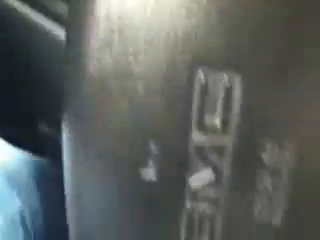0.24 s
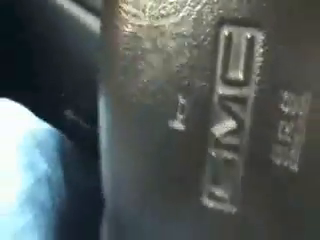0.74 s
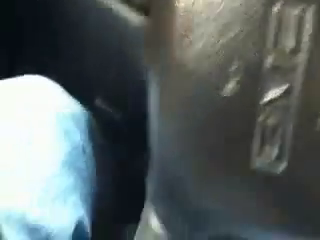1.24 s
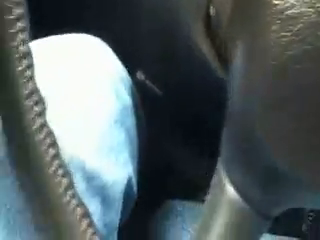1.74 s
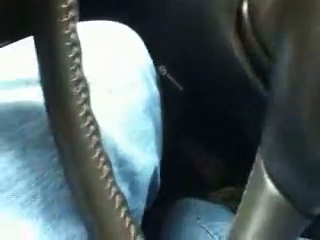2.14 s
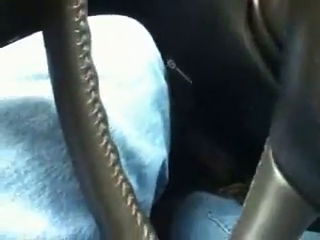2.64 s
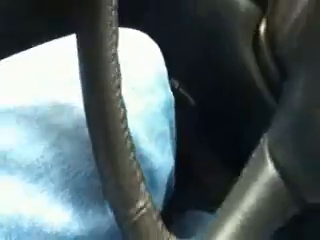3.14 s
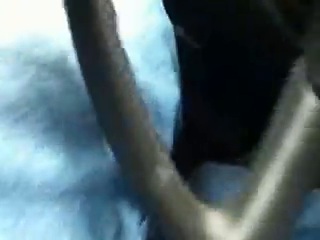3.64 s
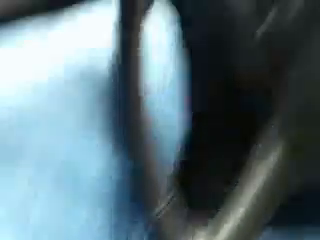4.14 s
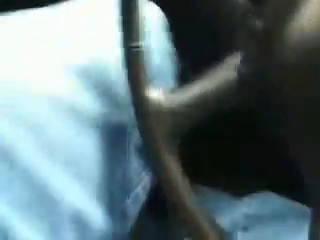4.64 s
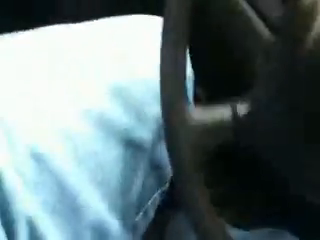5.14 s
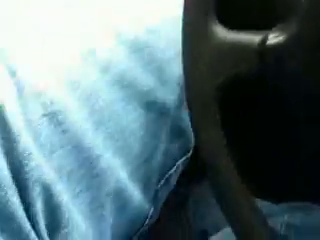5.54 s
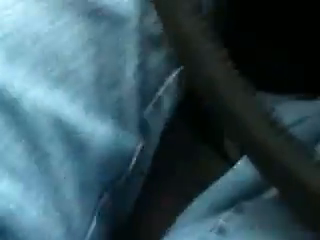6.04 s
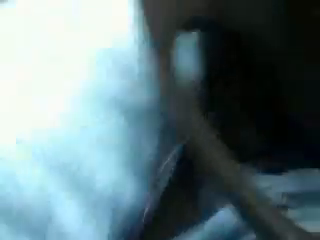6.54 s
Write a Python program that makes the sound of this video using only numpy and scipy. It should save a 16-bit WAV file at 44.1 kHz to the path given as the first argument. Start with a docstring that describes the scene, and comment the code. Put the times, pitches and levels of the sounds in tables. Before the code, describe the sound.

Inside a truck cab, a deep V8 engine surges and drops over churning, hissing water, with trim clicks, floor thuds and a late slosh.

```python
"""Inside the cab of a V8 pickup wading through deep water, picked up by a hand-held camera.
The engine surges from the start over drumming and churning water and a hiss; loose trim clicks and clacks.
From about 1.2 s dull blows land on the floor; a faint squeal comes near 1.9 s and the engine speeds up.
The throttle is stabbed at 3 s and a dry snap follows at 3.9 s; near 4.5 s water sloshes and slaps.
Hand bumps and rubs on the camera gather there and again from 6 s, when the heaviest floor blows land."""
import sys
import numpy as np
from scipy import signal
from scipy.fft import rfft, irfft, next_fast_len
from scipy.io import wavfile
from scipy.ndimage import uniform_filter1d, minimum_filter1d, map_coordinates

SR = 44100
rng = np.random.default_rng(int(sys.argv[2]) if len(sys.argv) > 2 else 0)


def bounce(signal):
    """Save signal as a 16-bit WAV file at the path given by the first command-line argument."""
    frames = np.transpose(np.atleast_2d(signal))
    limited = np.clip(frames, -1, 1)
    pcm = np.round(limited * 32767).astype(np.int16)
    wavfile.write(sys.argv[1], SR, pcm)


N = 299880
USUAL_LOAD_DB = -25  # the engine load at which the boom and water levels below apply


def amp(db):
    """Decibels to an amplitude factor."""
    return 10 ** (np.asarray(db) / 20)


def unit(x):
    """x scaled to rms 1."""
    return x / np.sqrt(np.mean(x ** 2) + 1e-20)


def noise(length=N):
    """White noise."""
    return rng.standard_normal(length)


def curves(rows):
    """One value per sample for each column after the time."""
    s, *columns = np.transpose(rows)
    return [np.interp(np.arange(N) / SR, s, column) for column in columns]


def along(points, hz):
    """(Hz, value) points read on a log frequency axis."""
    f, values = np.transpose(points)
    return np.interp(np.log(hz + 1), np.log(f), values)


def wobble(rate):
    """A smooth random curve, rate knots a second."""
    knots = noise(int(N * rate / SR) + 4)
    return map_coordinates(knots, [np.arange(N) * rate / SR])


def swells(rows):
    """A sum of bell-shaped bumps; the half length is the bell's standard deviation."""
    t = np.arange(N) / SR
    return sum(amp(db) * np.exp(-.5 * ((t - s) / half) ** 2) for s, db, half in rows)


def filtered(x, response):
    """x times a response of frequency."""
    m = next_fast_len(N + SR // 2)
    return irfft(rfft(x, m) * response(np.fft.rfftfreq(m, 1 / SR)), m)[:N]


def coloured(x, spectrum):
    """x shaped by (Hz, dB) points, at rms 1."""
    return unit(filtered(x, lambda hz: amp(along(spectrum, hz))))


def grains(rate, spread_db):
    """Random tiny impacts of uneven size, rate a second."""
    hits = rng.random(N) < rate / SR
    return unit(hits * noise() * amp(spread_db * noise()))


def steadied(x, span):
    """Narrow noise with its swells longer than span seconds evened out."""
    power = uniform_filter1d(np.abs(signal.hilbert(x)) ** 2, max(int(span * SR), 1))
    return unit(x / np.sqrt(np.abs(power) + 1e-9))


def add(track, s, sound):
    """Mix a sound in at s seconds."""
    part = track[round(s * SR):][:len(sound)]
    part += sound[:len(part)]


def engine(load_db):
    """Eight firings a cycle boom in the cab; the uneven cylinder banks add the other multiples."""
    # engine speed: (time [s], firing rate [Hz])
    speed = [(0, 111.8), (.3, 90.13), (.55, 89.73), (.85, 93.9), (1.02, 81.2), (1.25, 67), (1.95, 66.05),
             (2.17, 86), (2.3, 98.1), (2.47, 126), (2.7, 132), (2.85, 120), (2.95, 86.6), (3.2, 117.8),
             (3.4, 123.2), (3.8, 127.3), (4, 98.1), (4.15, 89.05), (4.47, 93), (4.92, 68.9), (5.3, 105),
             (5.46, 107.2), (5.65, 84), (6.15, 66.8), (6.37, 80), (6.58, 110.2), (6.8, 102.2)]
    # firing tone at the usual load: (frequency [Hz], level [dB])
    boom_levels = [(66, -44), (80, -31), (90, -23), (102, -19.5), (116, -17.5), (131, -17)]
    # overtones of the four-stroke cycle: (multiple, relative level [dB])
    overtones = [(3, -10), (4, -7), (6, -18), (7, -20.5), (9, -3.5), (10, -4.5), (11, -3.5), (12, 0.5),
                 (13, -2.5), (14, -9.5), (15, -10), (16, -1.5), (17, -7), (19, -5.5), (21, -9.5),
                 (22, -10.5), (24, -16.5), (29, -22.5), (32, -21.5)]
    # bands that the cab lifts: (frequency [Hz], width [Hz], lift [dB])
    cab = [(177, 7.4, 3), (241.8, 15.6, 7.5), (328, 28, 7.5)]
    # the engine lugs and the exhaust throbs deeply: (time [s], level [dB], half length [s])
    lugs = [(4.37, -24, .12), (6.42, -26.5, 0.12)]
    # intake roar: (frequency [Hz], density [dB per Hz])
    roar_spectrum = [(200, -23), (360, -4), (450, 0.5), (600, -7), (800, -26), (2000, -30), (8000, -58.5)]
    boom_per_load = 0.37  # dB of firing tone gained per dB of load
    flutter_db = 1.5  # uneven strength from one firing to the next
    pipe_hz, pipe_width_hz, pipe_lift_db = 61.3, 10, 9.5  # the exhaust pipe's resonance
    burble_below_load_db = -13.5  # away from the pipe's resonance
    roar_db = -39.5  # at the fastest turn

    firing_hz, = curves(speed)
    cycle = 2 * np.pi * np.cumsum(firing_hz) / SR / 8
    firing, bank, bank_hz = 8 * cycle, 5 * cycle, firing_hz * 5 / 8

    boom_db = along(boom_levels, firing_hz) + boom_per_load * (load_db - USUAL_LOAD_DB) + throttle()
    boom_db = boom_db + 1.24 * wobble(22.02) + flutter_db * wobble(90)
    boom = amp(boom_db) * np.sin(firing + 0.035 * wobble(36))

    pipe_db = pipe_lift_db / (1 + ((bank_hz - pipe_hz) / pipe_width_hz) ** 2)
    burble_db = load_db + burble_below_load_db + pipe_db + 2.2 * wobble(13)
    burble = (amp(burble_db) + swells(lugs)) * np.sin(bank + .15 * wobble(28))

    # no two cycles burn alike, so each overtone wavers in strength and phase
    growl = np.zeros(N)
    for multiple, db in overtones:
        phase = rng.uniform(0, 2 * np.pi) + 0.33 * wobble(14)
        growl += amp(db + 2.26 * wobble(16)) * np.sin(round(multiple) * cycle + phase)
    growl = filtered(growl, lambda f: amp(sum(db / (1 + ((f - hz) / width) ** 2) for hz, width, db in cab)))

    # the intake roars in puffs, louder the faster the engine turns
    puffs = coloured(noise() * (1 + .5 * np.sin(firing)), roar_spectrum)
    roar = amp(roar_db) * (firing_hz / firing_hz.max()) ** 1.76 * puffs
    return np.sqrt(2) * (boom + burble) + amp(load_db) * unit(growl) + roar, firing


def throttle():
    """Extra boom in dB: each stab opens fast, sags while held, and closes."""
    # stabs of the throttle: (time [s], held [s], extra boom [dB])
    stabs = [(.55, 0.22, 6.5), (3.02, 0.89, 7), (5.19, 0.358, 9), (6.42, 0.16, 8), (6.74, 0.073, 2)]
    attack_s, release_s, sag_db_per_s = 0.04, 0.036, 5.5
    t, boost = np.arange(N) / SR, np.zeros(N)
    for s, held, db in stabs:
        opening = np.clip((t - s) / attack_s, 0, 1)
        closing = np.exp(-np.maximum(t - s - held, 0) / release_s)
        boost += opening * closing * (db - sag_db_per_s * np.clip(t - s, 0, held))
    return boost


def water(firing, load_db):
    """Waves drum on the floor pan and rock the body; the flow churns in step with the firing, and hisses."""
    # water rushing along the body: (time [s], flow [dB])
    flow_points = [(0, -38.5), (.55, -40.5), (.95, -38), (1.17, -36), (1.55, -44), (2.1, -43.5), (2.7, -46),
                   (3.0, -39.5), (3.5, -44), (3.72, -38.5), (4.15, -41), (4.5, -27.5), (4.68, -33),
                   (4.9, -36.5), (5.22, -36), (5.52, -40.5), (5.78, -33), (6.1, -30), (6.45, -38.5),
                   (6.58, -36), (6.72, -27), (6.8, -26)]
    # waves that heave against the underside: (time [s], half length [s], drumming [dB], rumble [dB])
    waves = [(.07, 0.16, -29, -24.5), (0.723, 0.42, -29, -47), (1.287, 0.067, -45, -34),
             (2.073, 0.088, -29, -52), (2.645, 0.19, -35, -33), (3.713, 0.071, -23.5, -29),
             (4.074, 0.23, -29, -33), (4.437, 0.054, -17.5, -35), (4.627, 0.051, -14.5, -33),
             (5.164, 0.054, -26, -37), (6.075, 0.052, -22, -17.5), (6.34, 0.078, -26, -27)]
    # the hiss swells: (time [s], level [dB], half length [s])
    hiss_swells = [(.01, -41.5, 0.059), (1.82, -46.5, 0.33), (2.75, -55, 0.29), (3.68, -52, 0.029),
                   (4.1, -54, 0.16), (4.505, -33.5, 0.032)]
    # resonances of floor pan and cab air: (frequency [Hz], width [Hz], level [dB])
    pan_modes = [(137, 44, -2.5), (170.1, 30, -5.5)]
    # spectra of the four noises: (frequency [Hz], density [dB per Hz])
    rumble_spectrum = [(10, -25), (25, -10), (45, -4), (80, 0.5), (115, -15), (180, -17), (400, -69)]
    churn_spectrum = [(100, -37), (180, 0), (240, 4), (320, 1), (450, -6), (600, -22), (1000, -40),
                      (3000, -94.5)]
    wash_spectrum = [(200, -33), (450, 3), (620, 1), (850, -3.5), (1300, -10.5), (2000, -17.5),
                     (3200, -21.5), (8000, -33)]
    hiss_spectrum = [(500, -16), (1300, 4.5), (2200, 2.5), (2800, 1), (3400, 1), (5000, 0), (8000, -1),
                     (11000, -3), (13000, -8.5)]
    # each layer: its level at usual flow and load [dB], and the dB it gains per dB of load or flow
    drum_db, drum_per_load = -24.5, 0.16
    rumble_db, rumble_per_load = -31, 0.33
    churn_db, churn_per_flow = -29.5, 0.82
    hiss_db, hiss_per_flow = -54.5, 1
    usual_flow_db = -38
    steady_hiss_db = -57.5  # thin hiss that never stops
    wash_to_flow_db, gurgle_to_flow_db = -1.5, -5.5

    flow_db, = curves(flow_points)
    surge_db, push_db = flow_db - usual_flow_db, load_db - USUAL_LOAD_DB
    slaps = swells([(s, db, half) for s, half, db, _ in waves])
    heaves = swells([(s, db, half) for s, half, _, db in waves])

    def pan(f):
        """Resonances of alternating sign, falling off above 260 Hz."""
        modes = 0
        for k, (centre, width, db) in enumerate(pan_modes):
            damping = 1j * f * width
            modes = modes + (-1) ** k * amp(db) * damping / (centre ** 2 - f ** 2 + damping)
        return modes / (1 + (f / 260) ** 4)

    drumming = steadied(filtered(noise(), pan), span=0.11)
    drum = (amp(drum_db + drum_per_load * push_db) + slaps) * drumming

    rocking = steadied(coloured(noise(), rumble_spectrum), span=0.19)
    rumble = (amp(rumble_db + rumble_per_load * push_db) + heaves) * rocking

    pulsed = noise() * (1 + 0.38 * np.sin(firing))
    churn = amp(churn_db + churn_per_flow * surge_db) * coloured(pulsed, churn_spectrum)

    wash_grain = noise() + 0.81 * grains(1500, spread_db=1.5)
    wash = amp(flow_db + wash_to_flow_db + 1.47 * wobble(25)) * coloured(wash_grain, wash_spectrum)

    hiss_grain = noise() + 0.37 * grains(500, spread_db=3)
    hiss_level = amp(steady_hiss_db) + amp(hiss_db + hiss_per_flow * surge_db) + swells(hiss_swells)
    hiss = hiss_level * coloured(hiss_grain, hiss_spectrum)
    return drum + rumble + churn + wash + hiss + amp(flow_db + gurgle_to_flow_db) * gurgle()


def gurgle():
    """Bubbles under the floor, each a short ring that rises a little in pitch."""
    middle_hz, log_spread = 721.4, 0.705
    cycles = 31  # cycles of ringing to fall by 60 dB
    track, t = np.zeros(N), np.arange(SR // 12) / SR
    for when, pitch, size in rng.random((900, 3)):
        odds = np.clip(pitch, .02, .98) / (1 - np.clip(pitch, .02, .98))
        hz = middle_hz * odds ** (log_spread / 2)
        age = t * hz / cycles
        ring = np.sin(2 * np.pi * hz * t * (1 + 0.044 * age))
        ring = ring * (1 - np.exp(-t * hz)) * amp(-60 * age)
        # bubbles above the middle pitch are weaker
        add(track, when * N / SR, amp(-16 * size) * min(1, middle_hz / hz) * ring)
    return unit(track)


def sloshes():
    """Thick slugs of water tumble against the doors in uneven lumps."""
    # slugs of water: (time [s], level [dB], half length [s])
    slugs = [(4.46, -26, .016), (4.535, -27, 0.021), (4.65, -30.5, 0.075), (5.8, -40.5, .14)]
    # slosh: (frequency [Hz], density [dB per Hz])
    slosh_spectrum = [(150, -23), (400, 3), (560, -4), (750, -11), (980, -7), (1400, -23), (5000, -70)]
    lump_db, lumps_per_s = 4, 55
    lumps = unit(amp(lump_db * wobble(lumps_per_s)))
    return swells(slugs) * lumps * coloured(noise(), slosh_spectrum)


def thumps():
    """Soft blows set the floor booming in a dying sine with a softened onset."""
    # dull blows on the floor: (time [s], level before the soft onset [dB], pitch [Hz], 60 dB decay [s])
    blows = [(1.239, -4.5, 123, 0.21), (1.397, -9.5, 139.3, 0.28), (1.676, -7.5, 134, 0.16),
             (2.159, -8, 140.3, 0.19), (2.85, -6.5, 159, 0.17), (4.456, 1, 109, 0.055),
             (4.56, -1, 157.8, 0.18), (4.681, -3.5, 157.8, 0.16), (5.195, -0.5, 150, 0.087),
             (6.063, 12.5, 120.1, 0.034), (6.762, 13, 109, 0.087)]
    onset_s = 0.0051
    track, t = np.zeros(N), np.arange(SR // 3) / SR
    for s, db, hz, t60 in blows:
        add(track, s, amp(db - 60 * t / t60) * (1 - np.exp(-t / onset_s)) * np.sin(2 * np.pi * hz * t))
    return track


def clicks():
    """Loose trim chatters: each contact rings, knocks the panel and touches again; a clack and a snap stand out."""
    # small trim contacts: (time [s], level [dB], pitch [Hz], 60 dB decay [s], panel knock against level [dB])
    touches = [(0.5541, -31, 1730, 0.035, -1.5), (0.6995, -33, 2100, 0.045, -2),
               (.783, -34, 8000, .025, -7), (.799, -28.5, 3360, .05, -6), (0.8497, -31, 3550, .035, -8),
               (0.999, -33.5, 3430, 0.078, -11), (1.0109, -22.5, 1240, 0.04, -15),
               (1.111, -25.5, 3359, 0.05, -7), (1.175, -33, 2000, 0.046, 0), (1.222, -36, 2990, .045, -13),
               (1.593, -32.5, 2661, 0.035, -5), (3.612, -35, 6892, 0.033, -8),
               (4.789, -32.5, 7500, 0.02, -20), (4.9226, -28.5, 6432, 0.02, -19),
               (4.9543, -29.5, 4600, 0.015, -20), (5.035, -27, 7640, 0.026, -15),
               (5.052, -34, 5500, .09, -18), (5.1191, -20.5, 1350, 0.04, -16), (5.252, -35, 5200, .04, -20),
               (5.367, -35, 8600, .02, -23), (5.8906, -17, 4090, 0.011, -22),
               (6.445, -33.5, 6300, 0.028, -17), (6.47, -34, 6000, .025, -12),
               (6.759, -26, 7070, .008, -15)]
    # plastic trim panel: (frequency [Hz], level [dB], 60 dB decay [s])
    panel = [(580, -7, 0.03), (944, 2, 0.043), (1277, -1, 0.035), (1600, -2, 0.05), (2080, -6, 0.045)]
    # what the clack and the snap ring with: (frequency [Hz], level [dB], 60 dB decay [s])
    clack_modes = [(1460, -8, 0.06), (3720, -6.5, 0.025), (4370, -4.5, 0.026), (5260, -8, .032),
                   (6100, -3.5, .028), (7780, -2, 0.019), (10500, -5, 0.028)]
    snap_modes = [(1180, -1.5, 0.0062), (1840, -1.5, 0.0049), (3430, -7, 0.0042), (5200, -18, .003),
                  (9000, -13, 0.0009)]
    clack_s, clack_db, rebound_s, rebound_db = .8833, -15, .003, -5  # the clack strikes twice
    snap_s, snap_db = 3.9186, -.5
    tick_s, tick_db, tick_hz, tick_t60 = 3.918, -11, 5200, 0.02  # the catch slips just before the snap
    crack_share, clack_share, snap_share = 0.31, 0.4, .12  # noisy part of a contact
    dry_above_hz = 4800  # around this pitch the ring gives way to crack
    chatter_s, chatter_db, chatter_lowest = .006, -9, .6  # second touch: longest wait, level, lowest pitch ratio

    track, t = np.zeros(N), np.arange(SR // 10) / SR
    for s, db, hz, t60, knock_db in touches:
        share = 1 - (1 - crack_share) / (1 + (hz / dry_above_hz) ** 6)
        knock = np.zeros(len(t))
        for mode_hz, level, life in panel:
            strength = amp(level + rng.normal(0, 2.3))
            knock += strength * contact(t, mode_hz * rng.normal(1, 0.047), life, crack_share)
        add(track, s, amp(db) * (contact(t, hz, t60, share) + amp(knock_db) * knock))
        again = contact(t, hz * rng.uniform(chatter_lowest, 1), t60, share)
        add(track, s + chatter_s * rng.uniform(.5, 1), amp(db + chatter_db) * again)

    strikes = [(clack_s, clack_db, clack_modes, clack_share),
               (clack_s + rebound_s, clack_db + rebound_db, clack_modes, clack_share),
               (snap_s, snap_db, snap_modes, snap_share)]
    for s, db, modes, share in strikes:
        for k, (hz, level, t60) in enumerate(modes):
            add(track, s, (-1) ** k * amp(db + level) * contact(t, hz, t60, share))
    add(track, tick_s, amp(tick_db) * contact(t, tick_hz, tick_t60, crack_share))
    return track


def contact(t, hz, t60, crack_share):
    """Hard plastic meets plastic: a short ring and a crack around the same pitch."""
    band = signal.butter(2, [hz * 0.38, min(hz * 1.6, SR * .45)], "bandpass", fs=SR)
    crack = unit(signal.lfilter(*band, noise(len(t))))
    ring = np.sin(2 * np.pi * hz * t)
    return amp(-60 * t / t60) * ((1 - crack_share) * ring + crack_share * crack)


def bumps():
    """The hand knocks the camera: a clump of tiny slips rings the shell and throws off a gritty scuff."""
    # knocks and slips: (time [s], length [s], thud level [dB], thud pitch [Hz], scuff level [dB])
    knocks = [(1.111, .025, -38, 900, -41), (1.147, 0.027, -41, 800, -45), (3.832, 0.038, -47, 800, -40),
              (3.984, .02, -39, 900, -46), (4.266, 0.034, -29, 606, -35.5), (4.403, 0.013, -35, 600, -28),
              (4.422, 0.027, -32, 450, -31.5), (4.453, 0.0092, -17, 370, -22.5),
              (4.482, 0.015, -14, 540, -22.5), (4.498, .024, -20, 450, -26), (4.538, .018, -29, 690, -36),
              (4.653, 0.0099, -24, 520, -36), (6.004, 0.025, -28.5, 719.8, -34),
              (6.064, 0.017, -25, 380, -43), (6.111, 0.011, -24, 680.5, -31.5),
              (6.185, .018, -35, 850, -44), (6.665, 0.029, -23, 436.4, -44), (6.71, 0.012, -26, 450, -26),
              (6.732, 0.0054, -29, 850, -31.5), (6.743, 0.019, -20, 596, -34.5),
              (6.792, .01, -30, 750, -31)]
    # skin on the shell: (frequency [Hz], density [dB per Hz])
    scuff_spectrum = [(400, -16), (1000, -8), (1700, 4), (2600, -3), (4500, -6.5), (8000, -16.5),
                      (12000, -16)]
    attack_s, shell_q = 0.0016, 3.2
    overtone, overtone_db = 1.35, -11  # the shell also rings at this multiple of the thud pitch

    thuds, pressure, t = np.zeros(N), np.zeros(N), np.arange(SR // 8) / SR
    for s, length, thud_db, hz, scuff_db in knocks:
        force = (1 - np.exp(-t / attack_s)) * np.exp(-(t / length) ** 4)
        slips = force * noise(len(t))
        low_ring = signal.lfilter(*signal.iirpeak(hz, shell_q, SR), slips)
        high_ring = signal.lfilter(*signal.iirpeak(hz * overtone, shell_q, SR), slips)
        band = signal.butter(2, [hz / 2, hz * 2], "bandpass", fs=SR)
        shell = signal.lfilter(*band, low_ring + amp(overtone_db) * high_ring)
        # the thud level is the rms over the bump's length
        add(thuds, s, amp(thud_db) * shell * np.sqrt(length * SR / np.sum(shell ** 2)))
        add(pressure, s, amp(scuff_db) * force)
    return thuds + pressure * coloured(grains(4000, spread_db=2.0), scuff_spectrum)


def rubs():
    """Skin sticks and slips on the camera shell; cloth rustles in small clumps with a sparse crackle on top."""
    # the grip shifts: (time [s], level [dB], half length [s])
    grip_shifts = [(1.15, -42, 0.047), (4.51, -30, 0.079), (6.07, -41.5, 0.079), (6.72, -35, 0.041)]
    # cloth and grip rustle in spells: (time [s], level [dB], half length [s])
    rustles = [(.2, -43.5, 0.14), (.7, -48, 0.17), (1.16, -45, 0.12), (1.35, -46, 0.022), (3.79, -47, 0.22),
               (4.98, -42, 0.19), (6.1, -47, .18), (6.43, -45, 0.065)]
    # spectra of skin, cloth and crackle: (frequency [Hz], density [dB per Hz])
    rub_spectrum = [(120, -20), (350, 0.5), (650, 3), (1000, -1), (2000, -7), (4000, -12), (12000, -26)]
    cloth_spectrum = [(400, -22), (900, 8), (2200, 1), (3500, -3), (5500, -6.5), (12000, -14)]
    crackle_spectrum = [(1000, -27), (3500, 9), (7000, -3), (12000, -4)]
    crackle_db = -8.5  # against the cloth

    slips = grains(2200, spread_db=2.0) * amp(1.2 * wobble(110))
    pressure = swells(grip_shifts) * unit(amp(2.4 * wobble(60)))
    cloth = unit(amp(4.7 * wobble(70))) * coloured(grains(3500, spread_db=0.0), cloth_spectrum)
    crackle = unit(amp(5.4 * wobble(45))) * coloured(grains(900, spread_db=1.5), crackle_spectrum)
    return pressure * coloured(slips, rub_spectrum) + swells(rustles) * (cloth + amp(crackle_db) * crackle)


def whines():
    """Narrow hums and whines, each a thin band of noise, swell and fade."""
    # hums and whines: (time [s], level [dB], half length [s], pitch [Hz], width [Hz])
    hums = [(2.397, -33.5, 0.068, 425, 23), (3.069, -21, 0.059, 246.1, 11), (3.71, -16, 0.018, 230, 21),
            (4.3, -43.5, 0.14, 1270, 115), (6.417, -26, 0.14, 316.1, 33), (6.75, -17.5, .018, 255, 40)]
    track = np.zeros(N)
    for s, db, half, hz, width in hums:
        narrow = filtered(noise(), lambda f: 1 / (1 + ((f - hz) / width) ** 2))
        track += swells([(s, db, half)]) * steadied(narrow, span=0.092)
    return track


def squeal():
    """One faint, thin, slightly wavering tone sets in quickly, holds and fades away."""
    start_s, db, hz, held_s, t60, attack_s = 1.85, -50, 4124, .16, 1, .03
    t = np.arange(N) / SR - start_s
    fade_db = -60 * np.maximum(t - held_s, 0) / t60
    level = np.clip(t / attack_s, 0, 1) * amp(db + fade_db + 1.6 * wobble(24.9))
    return level * np.sin(2 * np.pi * hz * t + .55 * wobble(30))


def scene():
    """Engine and water share one load; the small sounds are close by in the cab."""
    # how hard the engine pulls against the water: (time [s], load [dB])
    load_points = [(0, -23), (.5, -23.5), (.97, -21.5), (1.5, -32.5), (2.1, -40), (2.4, -33), (2.86, -37.5),
                   (3.02, -18), (3.35, -20.5), (3.72, -23.5), (3.88, -25), (4.02, -22.5), (4.18, -23),
                   (4.38, -18.5), (4.8, -28.5), (5.2, -23), (5.5, -33), (6.15, -21.5), (6.35, -22),
                   (6.8, -18.5)]
    load_db, = curves(load_points)
    motor, firing = engine(load_db)
    outside = water(firing, load_db) + sloshes()
    cab_sounds = thumps() + clicks() + whines() + squeal()
    handling = bumps() + rubs()
    return (motor + outside + cab_sounds + handling)[None]


def record(dry):
    """The camera ducks briefly after peaks near full scale, rounds them off and keeps nothing above its band limit."""
    ceiling_db, hold_s, top_hz = -0.5, .025, 12750
    hold = int(hold_s * SR)
    needed = np.minimum(1, amp(ceiling_db) / (np.abs(dry[0]) + 1e-9))
    held = minimum_filter1d(needed, hold, origin=(hold - 1) // 2)  # looks back over the hold time
    limited = dry[0] * uniform_filter1d(held, size=90)
    rounded = limited / (1 + np.abs(limited) ** 12) ** (1 / 12)
    return filtered(rounded, lambda hz: hz < top_hz)[None]


dry = scene()
out = record(dry)
bounce(out)
```